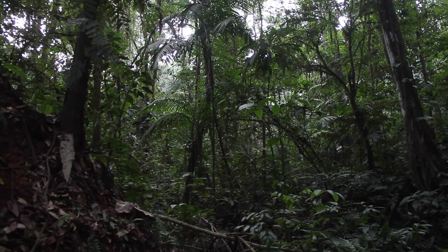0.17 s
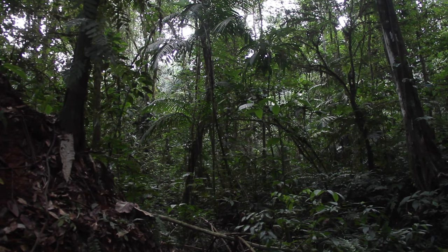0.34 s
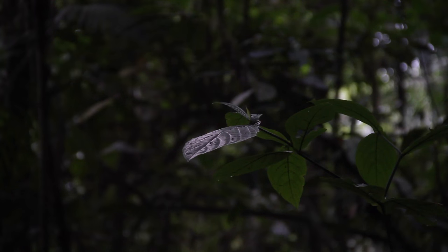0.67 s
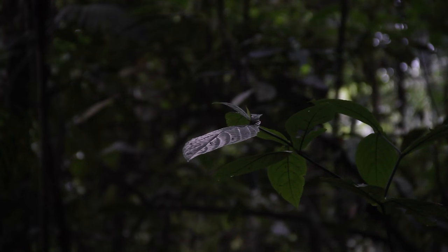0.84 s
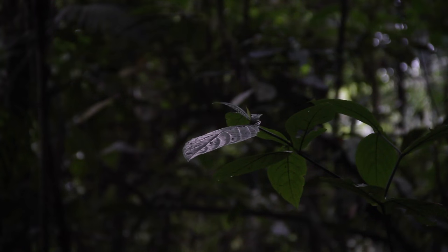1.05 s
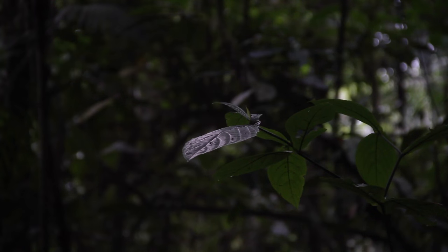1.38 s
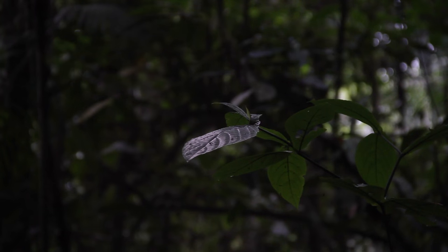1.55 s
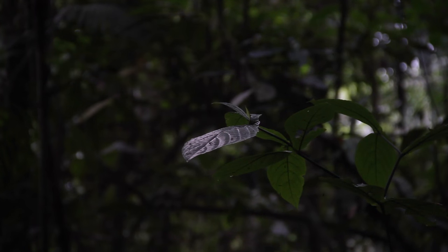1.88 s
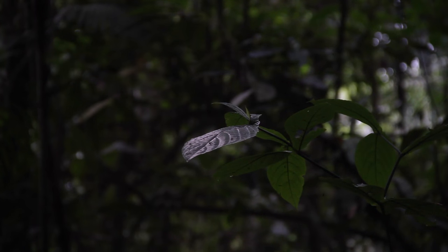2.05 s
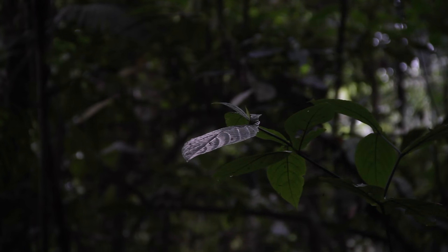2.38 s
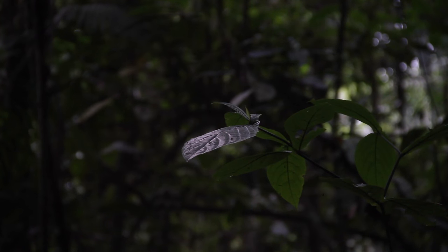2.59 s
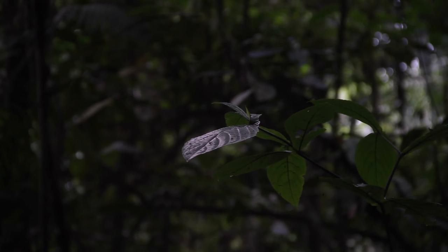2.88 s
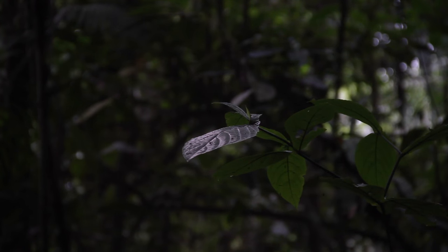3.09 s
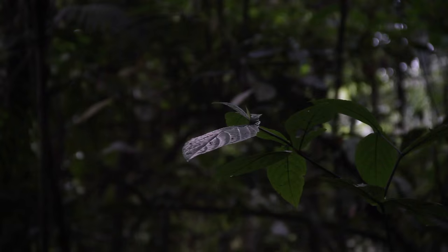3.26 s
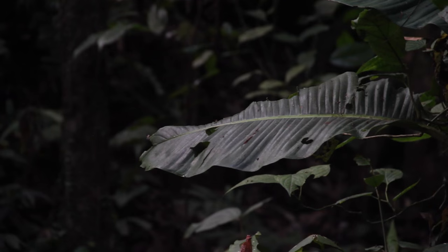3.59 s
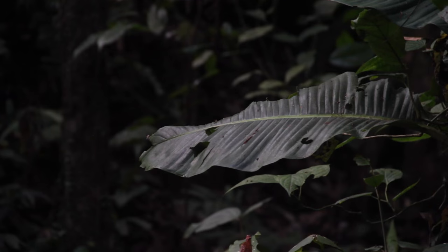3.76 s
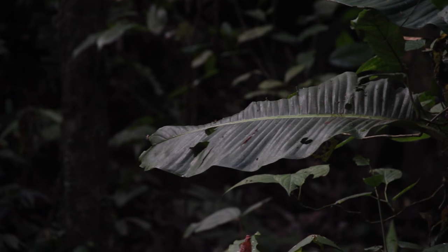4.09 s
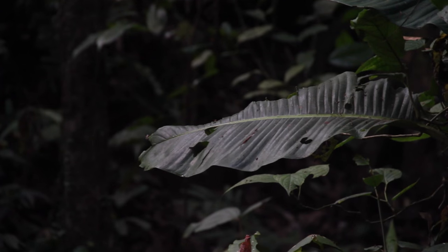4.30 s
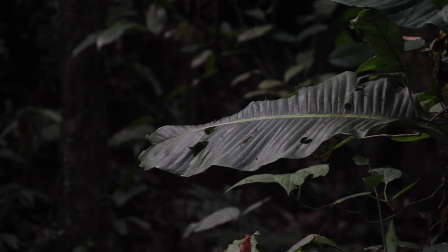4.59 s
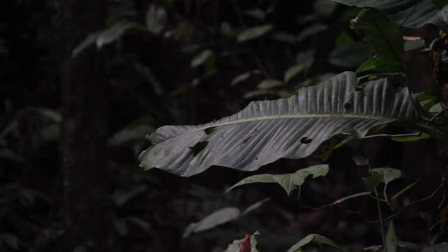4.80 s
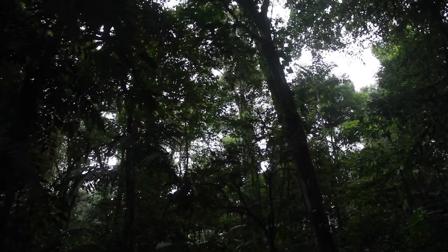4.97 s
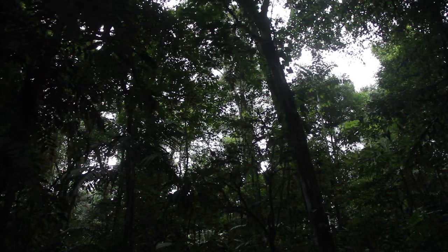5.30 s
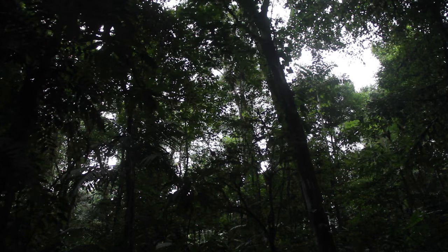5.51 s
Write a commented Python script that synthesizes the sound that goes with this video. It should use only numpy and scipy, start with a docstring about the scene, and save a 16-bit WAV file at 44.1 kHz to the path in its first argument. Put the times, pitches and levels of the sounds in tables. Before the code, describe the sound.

Abrupt rattling bursts of a near cicada around eight kilohertz dominate quiet jungle murmur, sparse crickets, a distant whistling bird and small hollow taps.

```python
"""A cicada buzzes close by in bursts of membrane clicks, each with a blurred, echoing part; rainforest by day.
Two crickets chirp in sagging near-sine strokes, and a far bird whistles in gliding sines.
Soft knocks ring as decaying sines, rustles are dense snaps, and faint wavering tones hum.
A lower-voiced cicada swells far off; filtered noise makes the far insect drones and the forest murmur below.
One microphone feeds the left input; the open right one has only hiss, a thin whine and a drifting offset."""
import sys
import numpy as np
from scipy import signal
from scipy.fft import rfft, irfft, next_fast_len
from scipy.io import wavfile
from scipy.ndimage import uniform_filter1d

SR = 44100
rng = np.random.default_rng(int(sys.argv[2]) if len(sys.argv) > 2 else 0)


def wav_out(sig):
    """Save sig, one row per channel (or a flat mono array), as 16-bit PCM at SR to the path in sys.argv[1]."""
    wavfile.write(sys.argv[1], SR, np.round(np.clip(np.atleast_2d(sig).T, -1, 1) * 32767).astype(np.int16))


N = 248724

# Source levels are set ahead of the echoes and the microphone gain. Spectra are relative: colour() sets rms to 1.
# Near cicada, spectrum: frequency_hz, density_db (per Hz)
CICADA_SPECTRUM = [(6400, -34.5), (7200, -16), (7640, -7.5), (7950, 8), (8250, 8.5), (8600, 1.5),
                   (9100, -1), (9800, -13.5), (10700, -86)]
# Membrane clicks within one cycle: place (0-1 of the cycle), level_db
BUCKLES = [(0, 0), (.27, -11), (.53, -1), (.79, -11)]
# Bursts of the near cicada, the last two columns for the blurred, echoing part of the same buzz:
# start_s, end_s, start_level_db, end_level_db, blur_level_db, blur_swell_s
BURSTS = [(0, 0.054, -42.5, -49, -36, 0.047), (.1, 0.242, -63, -61, -43.5, 0.054),
          (.25, 0.4, -43.5, -56, -38, 0.2), (0.508, 0.673, -46.5, -47, -40.5, 0.084),
          (0.736, 0.773, -44, -43, -43.5, 0.023), (.935, 1.519, -46, -43.5, -38, 0.05),
          (1.762, 2.305, -44, -44, -38.5, 0.086), (2.373, 2.426, -49, -41, -46.5, 0.055),
          (2.586, 3.158, -45, -43.5, -38, 0.063), (3.266, 3.297, -52, -41.5, -48, .04),
          (3.376, 3.557, -45, -42.5, -39, 0.035), (3.61, 3.748, -44.5, -45, -39.5, 0.081),
          (3.955, 4.02, -51, -67, -50.5, 0.027), (4.032, 4.152, -43, -43.5, -46.5, .08),
          (4.315, 4.375, -60, -64, -49, 0.036), (4.386, 4.486, -43.5, -56, -45.5, .08),
          (4.544, 4.728, -44.5, -51, -39, 0.044), (4.83, 4.895, -45, -58, -46.5, 0.068),
          (5.08, 5.14, -53, -62, -55, .04), (5.153, 5.64, -44.5, -45.5, -38.5, 0.25)]
# Blurred part of the buzz, spectrum: frequency_hz, density_db (per Hz)
BLUR_SPECTRUM = [(6800, -33.5), (7500, -13), (7900, 0.5), (8220, 6.5), (8550, 0.5), (9200, -10),
                 (10200, -97)]
# Blurred part between bursts: time_s, level_db
BLUR_REST = [(0, -56.5), (3.5, -52), (4.3, -54.5), (5.64, -55)]
# Lower-voiced cicada swelling far off: time_s, level_db
LOW_CICADA_SWELL = [(5.0, -84), (5.15, -71), (5.25, -60.5), (5.45, -56.5), (5.64, -54)]
# Lower-voiced cicada, spectrum: frequency_hz, density_db (per Hz)
LOW_CICADA_SPECTRUM = [(4500, -22), (5200, -7), (5570, 0), (5870, -8), (6500, -30)]
# Cricket chirps of three wing strokes: start_s, level_db (first stroke), cricket (0 near, 1 far)
CHIRPS = [(1.071, -41.5, 1), (1.552, -36, 0), (2.644, -42, 1), (3.331, -34.5, 0)]
# Wing strokes of each cricket: start_pitch_hz, pitch_fall_hz, stroke_s, step_s (from stroke to stroke)
CRICKETS = [(4640, 420, .023, .030), (5030, 230, .016, .0298)]
# Far bird notes: start_s, length_s, start_hz, top_hz, end_hz, top_at (0-1), loudest_at (0-1),
# level_db (rms at the loudest point, before the waver)
BIRD_NOTES = [(.69, 0.065, 1640, 1620, 1380, .05, .65, -63),
              (0.799, 0.092, 1357, 1543, 1360, 0.32, .7, -59),
              (1.566, .055, 1790, 1780, 1440, 0.16, 0.8, -58),
              (1.615, 0.124, 1805, 1756, 1660, 0.69, 0.6, -58.5),
              (2.155, 0.076, 1570, 1550, 1320, .05, .25, -61),
              (2.241, 0.097, 1353, 1506, 1340, .4, 0.75, -58.5),
              (5.353, 0.14, 1730, 1530, 1418, 0.17, 0.7, -61)]
# Soft knocks: start_s, level_db (before the soft rise and decay), pitch_hz
KNOCKS = [(.305, -39, 400), (.465, -48, 495), (.578, -39, 405), (.79, -45, 500), (1.624, -40, 430),
          (1.70, -45, 540), (2.198, -40, 405), (2.313, -44, 545), (3.133, -47, 450), (3.541, -40, 420),
          (5.383, -49, 400)]
# Rustles: start_s, end_s, level_db
RUSTLES = [(3.535, 3.59, -50), (4.01, 4.1, -59.5)]
# Loud single snaps within a rustle: time_s, level_db (over the spread of the small ones)
SNAPS = [(3.54, 8), (3.565, 9)]
# Rustle spectrum: frequency_hz, density_db (per Hz)
RUSTLE_SPECTRUM = [(1200, -11), (2300, -13), (2900, 2), (3500, -6), (4400, -2.5), (5500, -11), (8000, -32)]
# Far insect drones: frequency_hz, width_hz, early_level_db, late_level_db
DRONES = [(5380, 38, -103, -69.5), (6120, 470, -60, -62.5), (6950, 130, -64.5, -67)]
# Thin high drone, spectrum: frequency_hz, density_db (per Hz)
THIN_SPECTRUM = [(8800, -30), (9300, 2), (9700, 0), (10150, -8), (10500, -37)]
# Start and end of the thin drone: time_s
THIN_SPAN = [(.52,), (3.6,)]
# Hums: pitch_hz, pitch_waver_hz, early_level_db, late_level_db
HUMS = [(197, 7, -65, -64), (811, 5, -90, -66.5)]
# Forest murmur: time_s, low_level_db (below 1500 Hz), high_level_db (above)
FOREST_LEVELS = [(0, -54, -52), (1, -54, -54), (2, -53.5, -52.5), (3, -53.5, -53), (3.6, -54, -53),
                 (4.2, -55, -53), (4.8, -56.5, -56), (5.64, -58, -59)]
# Forest murmur, spectrum: frequency_hz, density_db (per Hz)
FOREST_SPECTRUM = [(15, -12), (30, 3), (50, -6.5), (130, -7.5), (250, -8.5), (420, -7.5), (750, -11),
                   (1300, -15), (2800, -18), (5000, -18.5), (7200, -26.5), (9500, -16.5), (10600, -37.5),
                   (12500, -26.5), (15600, -25)]
# Amplifier hiss, spectrum: frequency_hz, density_db (per Hz)
HISS_SPECTRUM = [(20, 6), (100, 8), (200, -1), (300, -3), (550, 3), (2000, 0), (6000, -2), (15000, -2)]
# Electrical whine, one row for the left and one for the right input: level_db (rms before the top cut)
WHINE_DB = [
    [-74],
    [-72.5],
]
# Offset of the right input: time_s, offset (share of full scale)
OFFSET = [(0, 0.11), (3.6, 0.11), (4.1, 0.11), (4.6, .097), (5.01, 0.082), (5.3, .1), (5.5, 0.11),
          (5.64, 0.12)]

CYCLE_HZ = 76.37   # both drum membranes of the near cicada buckle once a cycle
# Blurred part: its swell is partly over when the burst starts; it sags during the burst and dies away after it
SWELL_LEAD, SWELL_DEPTH_DB, SAG_DB_PER_S, DIE_DB_PER_S = 0.46, 23, 5.5, 134
STROKE_LOSS_DB = .6   # from one wing stroke to the next
ECHO_S, ECHO_DB = .0125, -5.5   # off a trunk beside the far cricket
NOTE_EDGE_DB = 6   # how far a bird note sinks towards its ends
THIN_DB = -58.5
LEVEL_STEP_S = 3.58   # when the hums and drones step in level
HISS_DB, WHINE_HZ = -60.8, 15734.2   # hiss: rms before the top cut
MIC_GAIN_DB, CUTOFF_HZ = 6, 15800
LEFT_OFFSET_SHARE = -0.55   # the left offset is a smaller mirror of the right


def from_db(db):
    """Decibel law: 20 dB is a factor of ten in amplitude."""
    return 10 ** (np.asarray(db) / 20)


def rms_one(x):
    """Normalisation: the root of the mean power becomes 1."""
    return x / np.sqrt(np.mean(x ** 2) + 1e-20)


def in_time(rows):
    """Linear interpolation: the columns of a time table at every sample."""
    time_s, *columns = np.transpose(rows)
    return [np.interp(np.arange(N) / SR, time_s, column) for column in columns]


def while_on(rows):
    """Gating: 1 within the span of a table, 0 outside, with edges softened by a moving average."""
    t = np.arange(N) / SR
    gate = 1. * (t > rows[0][0]) * (t < rows[-1][0])
    return uniform_filter1d(gate, size=200)


def early_late(early_db, late_db):
    """Level step: the gain passes once from one level to another within 30 ms."""
    rows = [(LEVEL_STEP_S, early_db), (LEVEL_STEP_S + 0.03, late_db)]
    return from_db(in_time(rows)[0])


def colour(x, spectrum):
    """Spectral filtering: each frequency is weighted by a curve in dB over log frequency; rms 1."""
    size = next_fast_len(N)
    hz, db = np.transpose(spectrum)
    bin_hz = np.arange(size // 2 + 1) * SR / size
    gain = from_db(np.interp(np.log(bin_hz + 1), np.log(hz), db))   # + 1 avoids log of 0
    return rms_one(irfft(rfft(x, size) * gain, size)[:N])


def drift(corner_hz):
    """Slow random fluctuation: noise at every 40th sample through a double one-pole low-pass; spread 1."""
    r = np.exp(-80 * np.pi * corner_hz / SR)
    noise = rng.standard_normal(N // 40 + 2002)
    slow = signal.lfilter([1], [1, -2 * r, r * r], noise)[2000:]   # drop the run-in
    return np.interp(np.arange(N) / 40, np.arange(len(slow)), rms_one(slow))


def trunks(x, wet_db, t60):
    """Multiple scattering: trunks and leaves add a cloud of echoes that dies by 60 dB in t60 seconds."""
    t = np.arange(SR // 2) / SR
    cloud = rng.standard_normal(len(t)) * from_db(-60 * t / t60) * (t > .003)
    cloud = cloud / np.sqrt(np.sum(cloud ** 2))
    return x + from_db(wet_db) * signal.fftconvolve(x, cloud)[:N]


def drumming(start_s, end_s, cycle_hz, jitter_s, spread_db):
    """Membrane buckling: a click train whose beat starts slow and wanders, its clicks uneven in strength."""
    cycles = np.arange(0, (end_s - start_s) * cycle_hz)
    wander_s = np.cumsum(.00035 * rng.standard_normal(len(cycles)))
    clicks = np.zeros(N)
    for place, db in BUCKLES:
        chance = rng.standard_normal((len(cycles), 2))
        slow_start_s = .005 * (1 - np.exp(-(cycles + place) / 2.5))
        at_s = start_s + (cycles + place) / cycle_hz + slow_start_s + wander_s + jitter_s * chance[:, 0]
        at = at_s * SR
        strength = from_db(db + spread_db * chance[:, 1]) * (at < end_s * SR)
        clicks[np.clip(at, 0, N - 1).astype(int)] += strength
    return clicks


def near_cicada():
    """Impulsive excitation: abrupt bursts of membrane clicks are shaped by the cicada's spectrum."""
    clicks, level = np.zeros(N), np.zeros(N)
    for start_s, end_s, first_db, last_db, *_ in BURSTS:
        clicks += drumming(start_s, end_s, CYCLE_HZ, jitter_s=.00025, spread_db=1.3)
        rows = [(start_s - .004, first_db), (end_s + .004, last_db)]
        level += from_db(in_time(rows)[0]) * while_on(rows)
    return trunks(colour(clicks, CICADA_SPECTRUM) * level, wet_db=-4, t60=0.043)


def blur_level():
    """Power addition: the blurred part swells with each burst, sags slowly and dies away to a resting level."""
    t = np.arange(N) / SR
    power = from_db(2 * in_time(BLUR_REST)[0])
    for start_s, end_s, _, _, db, swell_s in BURSTS:
        full_s = start_s + (1 - SWELL_LEAD) * swell_s
        before, after = np.maximum(full_s - t, 0), np.maximum(t - full_s, 0)
        loss_db = SWELL_DEPTH_DB * before / swell_s
        loss_db += SAG_DB_PER_S * after
        loss_db += DIE_DB_PER_S * np.maximum(t - end_s, 0)
        power = power + from_db(2 * (db - loss_db))
    return np.sqrt(power)


def blurred_buzz():
    """Reverberant blurring: three click trains at unlike speeds, mostly echo, smear the single clicks."""
    clicks = sum(drumming(0, N / SR, hz, jitter_s=.0005, spread_db=1.5) for hz in (74.1, 75.6, 78.2))
    return colour(trunks(clicks, wet_db=5, t60=.2), BLUR_SPECTRUM) * blur_level()


def low_cicada():
    """Reverberant distance: slower drumming with a lower spectrum swells up, more echo than direct sound."""
    clicks = drumming(0, N / SR, 60.0, jitter_s=0.00036, spread_db=0.5)
    buzz = colour(trunks(clicks, wet_db=2.0, t60=0.5), LOW_CICADA_SPECTRUM)
    return buzz * from_db(in_time(LOW_CICADA_SWELL)[0]) * while_on(LOW_CICADA_SWELL)


def crickets():
    """Stridulation: each wing stroke is a near sine that holds its pitch, then sags as the wing slows."""
    out = np.zeros((2, N))
    for start_s, db, who in CHIRPS:
        hz, fall_hz, stroke_s, step_s = CRICKETS[who]
        along = np.linspace(0, 1, round(stroke_s * SR))
        edges = np.minimum(along / 0.28, 1) * np.minimum((1 - along) / 0.091, 1)
        shape = edges * from_db(-9 * along ** 2)
        wave = np.sin(2 * np.pi * np.cumsum(hz - fall_hz * along ** 2.7) / SR)
        for k in range(3):
            at = round((start_s + k * step_s) * SR)
            out[who, at:at + len(along)] += from_db(db - k * STROKE_LOSS_DB) * shape * wave
    near, far = out
    far = far + from_db(ECHO_DB) * np.roll(far, round(ECHO_S * SR))
    return trunks(near, wet_db=-12, t60=.3) + trunks(far, wet_db=-8.5, t60=.4)


def bird():
    """Frequency gliding: pure whistles move in pitch and waver in level, a little blurred by distance."""
    out = np.zeros(N)
    for start_s, length_s, start_hz, top_hz, end_hz, top_at, loudest_at, db in BIRD_NOTES:
        along = np.linspace(0, 1, round(length_s * SR))
        hz = np.interp(along, [0, top_at, 1], [start_hz, top_hz, end_hz])
        level_db = db - NOTE_EDGE_DB * np.interp(along, [0, loudest_at, 1], [1, 0, 1]) ** 2
        whistle = np.sqrt(2) * np.sin(2 * np.pi * np.cumsum(hz) / SR)   # rms 1
        at = round(start_s * SR)
        out[at:at + len(along)] += from_db(level_db) * signal.windows.tukey(len(along), .1) * whistle
    return trunks(out * from_db(1.5 * drift(25)), wet_db=-8, t60=.3)


def knocks():
    """Damped resonance: blows on hollow wood rise softly, then ring briefly with a weak overtone."""
    out = np.zeros(N + SR)
    t = np.arange(SR // 8) / SR
    for start_s, db, hz in KNOCKS:
        at = round(start_s * SR)
        ring = np.sin(2 * np.pi * hz * t) + 0.26 * np.sin(2 * np.pi * 1.62 * hz * t)
        decay = from_db(db - 60 * t / 0.079)   # 60 dB in 79 ms
        out[at:at + len(t)] += decay * (1 - np.exp(-t / 0.0039)) * ring
    return out[:N]


def rustle():
    """Random impulses: dense small snaps of uneven size, and a few big ones, under a fixed spectrum."""
    happens = rng.random(N) < 1800 / SR   # 1800 snaps per second on average
    clicks = happens * rng.standard_normal(N) * from_db(2.5 * drift(60))
    for time_s, db in SNAPS:
        clicks[round(time_s * SR)] = from_db(db)
    level = sum(from_db(db) * while_on([(start_s,), (end_s,)]) for start_s, end_s, db in RUSTLES)
    return colour(clicks, RUSTLE_SPECTRUM) * level


def drones():
    """Incoherent superposition: many far singers blur into noise through a two-pole resonance."""
    out = np.zeros(N)
    for hz, width_hz, early_db, late_db in DRONES:
        r = np.exp(-np.pi * width_hz / SR)
        poles = [1, -2 * r * np.cos(2 * np.pi * hz / SR), r * r]
        band = signal.lfilter([1, 0, -1], poles, rng.standard_normal(N))
        out += rms_one(band) * early_late(early_db, late_db)
    return out


def thin_drone():
    """Band-limited noise: a narrow high band comes, flickers a little in level, and goes."""
    band = colour(rng.standard_normal(N), THIN_SPECTRUM)
    return band * from_db(THIN_DB + 2.7 * drift(11)) * while_on(THIN_SPAN)


def hums():
    """Frequency and amplitude modulation: faint sines waver slowly in pitch and level."""
    out = np.zeros(N)
    for hz, waver_hz, early_db, late_db in HUMS:
        sine = np.sin(2 * np.pi * np.cumsum(hz + waver_hz * drift(7.5)) / SR)
        tone = sine * from_db(3.2 * drift(40.0))
        out += rms_one(tone) * early_late(early_db, late_db)
    return out


def forest():
    """Independent band fluctuation: bands of noise swell and sink on their own, the low ones the most."""
    low_db, high_db = in_time(FOREST_LEVELS)
    noise, out = colour(rng.standard_normal(N), FOREST_SPECTRUM), np.zeros(N)
    edges = np.array([0, 90, 180, 360, 720, 1500, 3000, 6000, 11000, SR])   # Hz
    spectrum, hz = rfft(noise), np.arange(N // 2 + 1) * SR / N
    for low, high in zip(edges, edges[1:]):
        band = irfft(spectrum * (hz >= low) * (hz < high), N)
        lumps_db = 1.6 * drift(10.6) if high <= 720 else 1.4 * drift(9.1)
        level_db = low_db if high <= 1500 else high_db
        out += band * from_db(level_db + lumps_db)
    return out


def scene():
    """Superposition: the pressures of all sources add at the one microphone, on the left input."""
    cicadas = near_cicada() + blurred_buzz() + low_cicada()
    insects = cicadas + crickets() + drones() + thin_drone()
    left = insects + bird() + knocks() + rustle() + hums() + forest()
    return np.array([left, np.zeros(N)])


def record(dry):
    """Linear electronics: gain, additive hiss and whine, a steep top cut, then a drifting offset."""
    hiss = from_db(HISS_DB) * np.array([colour(rng.standard_normal(N), HISS_SPECTRUM) for side in dry])
    whine = np.sqrt(2) * from_db(WHINE_DB) * np.sin(2 * np.pi * WHINE_HZ * np.arange(N) / SR)
    sound = from_db(MIC_GAIN_DB) * dry + hiss + whine
    top_cut = signal.ellip(14, .5, 70, CUTOFF_HZ, fs=SR, output="sos")
    offset = in_time(OFFSET)[0] * np.array([[LEFT_OFFSET_SHARE], [1]])
    return signal.sosfilt(top_cut, sound) + offset


dry = scene()
out = record(dry)
wav_out(out)
```